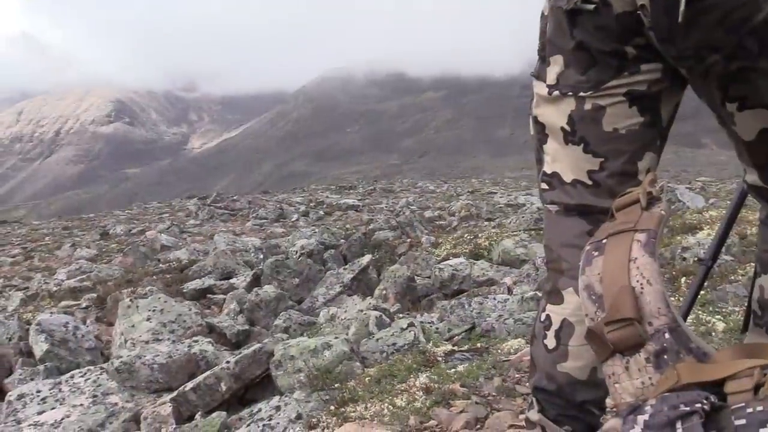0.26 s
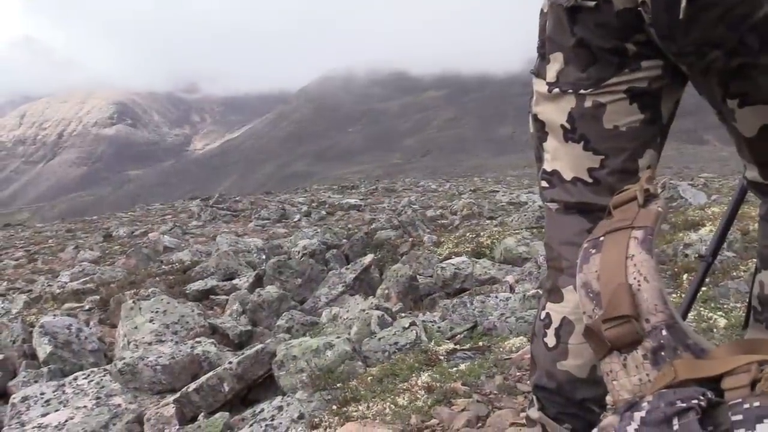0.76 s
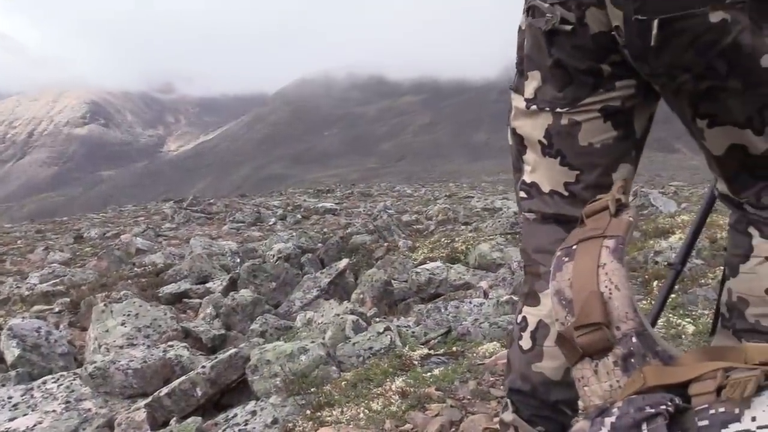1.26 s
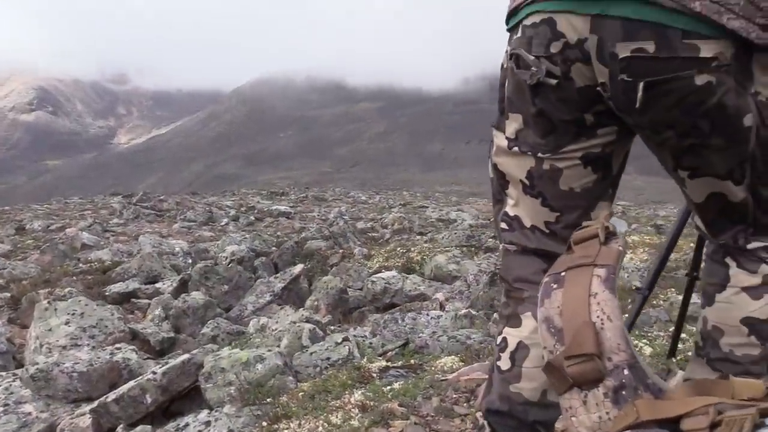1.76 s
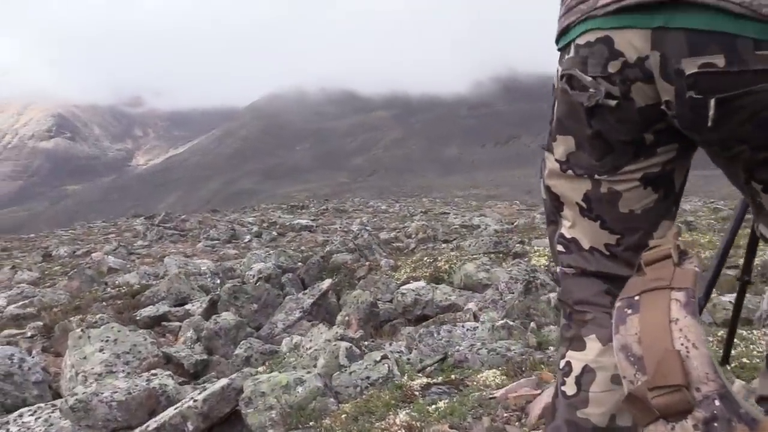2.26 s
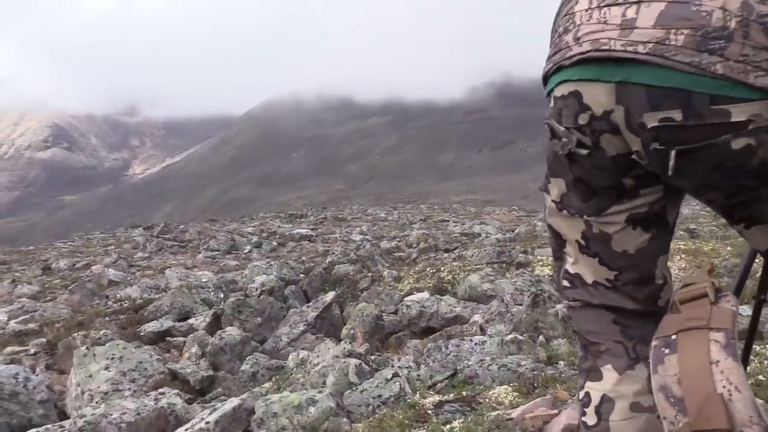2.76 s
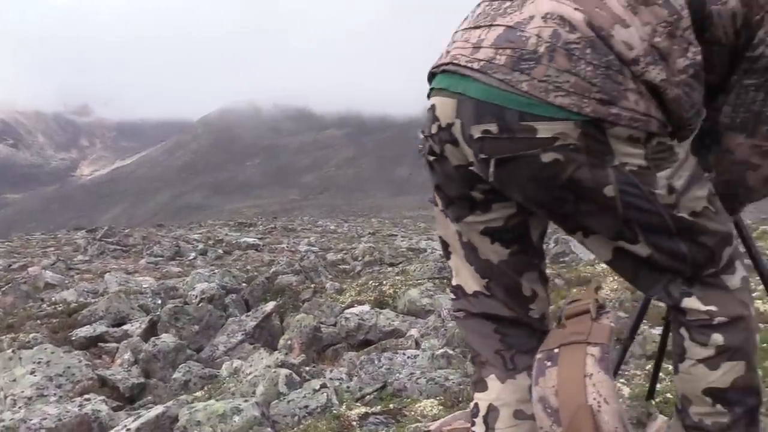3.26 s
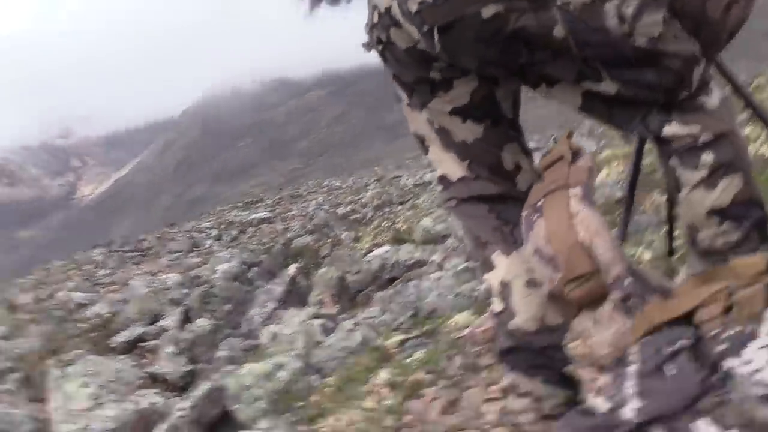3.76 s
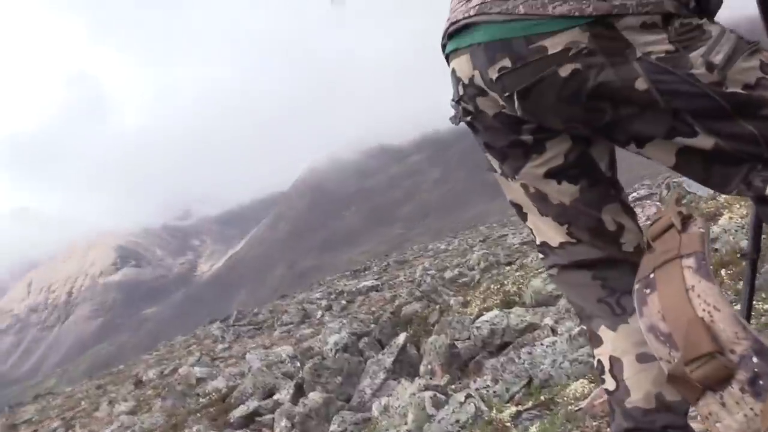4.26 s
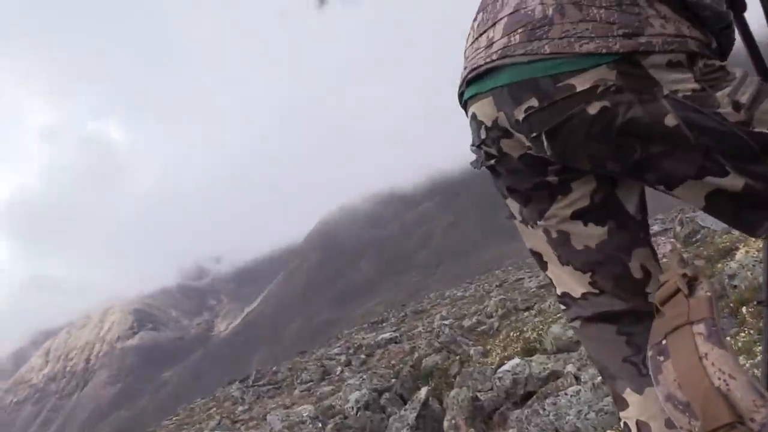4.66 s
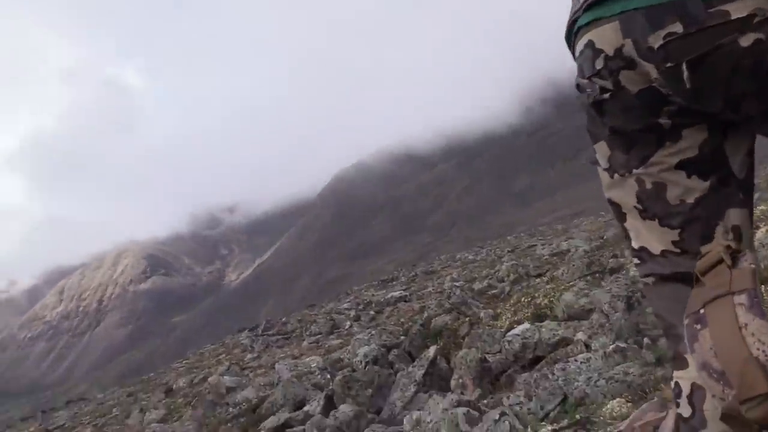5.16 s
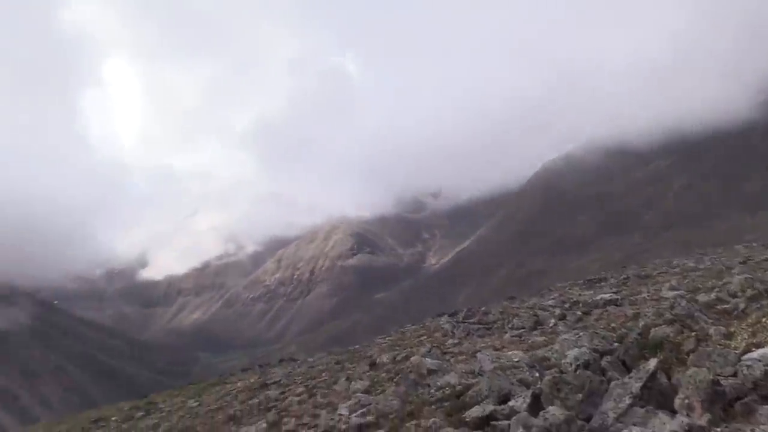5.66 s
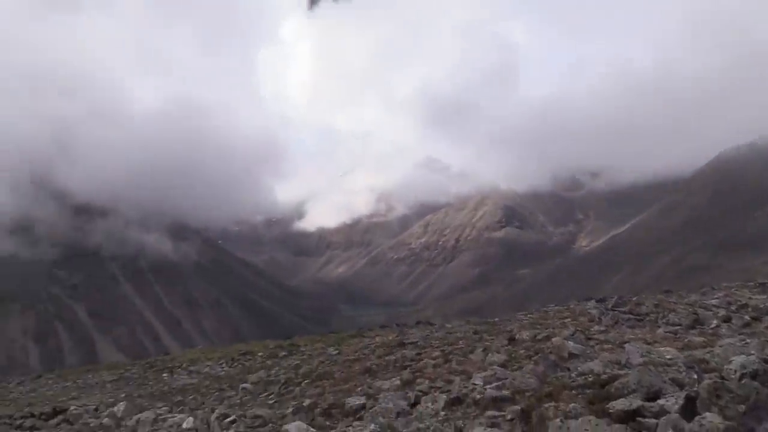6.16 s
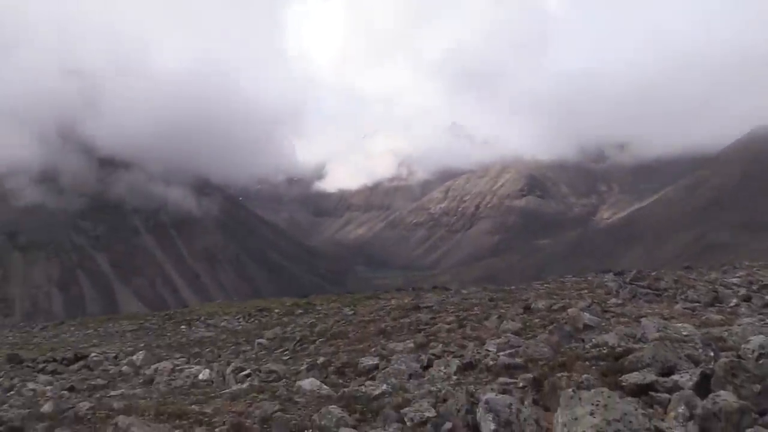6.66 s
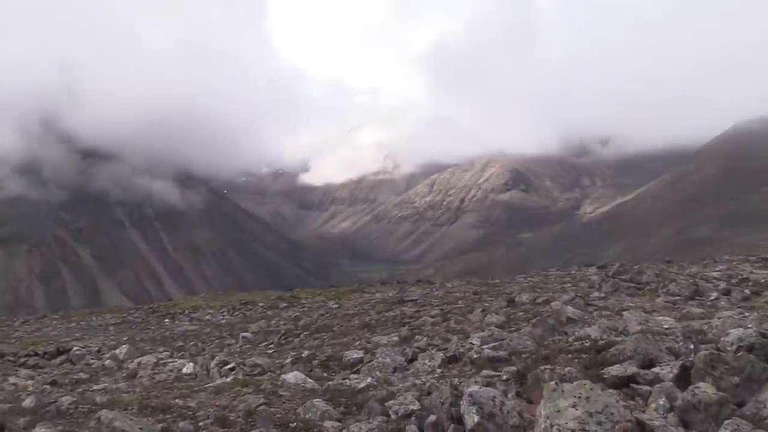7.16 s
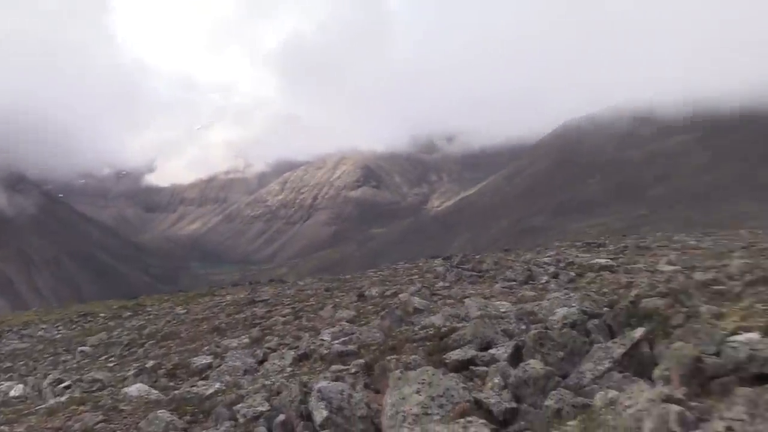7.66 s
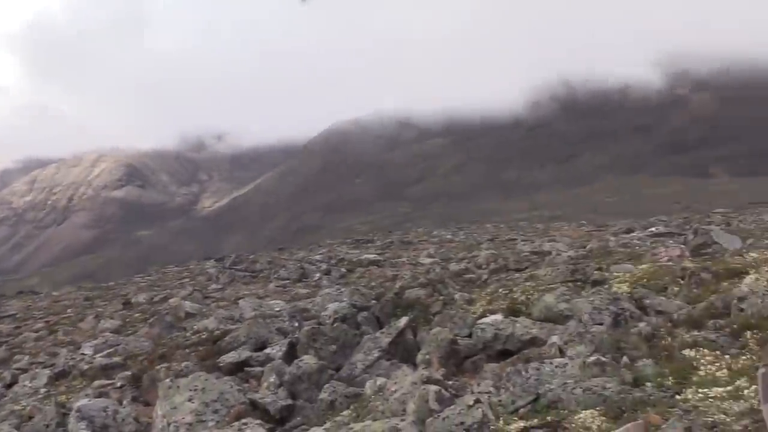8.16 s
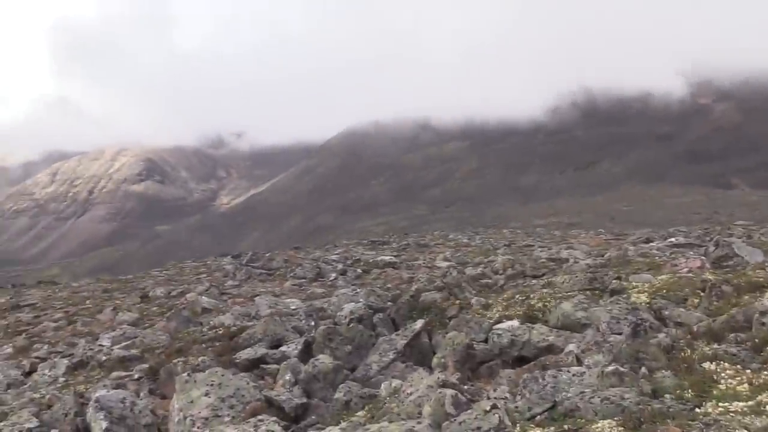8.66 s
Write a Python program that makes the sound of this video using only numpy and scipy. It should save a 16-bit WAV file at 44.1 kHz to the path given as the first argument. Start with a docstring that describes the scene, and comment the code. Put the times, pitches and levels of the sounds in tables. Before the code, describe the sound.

Stones clack and grind under boots while a pole and tripod legs clink against them, close to a hand-held stereo microphone outdoors. Dull thuds carry through the microphone's body. After low gusts and a single bump with a brief squeak, the busiest clatter comes just before the middle. It then thins to scattered knocks and taps, with faint, steady mountain air in the gaps.

```python
"""On an open ridge, boots, a pole and a tripod shift on loose rock beside a hand-held stereo microphone.
Far air makes a soft, steady hiss, and gusts rumble on the microphone. The level dips briefly twice.
A joint squeaks once, stones grind as they slip, and weight lands as dull thuds through the casing.
Loudest are the thuds and the clacks: hard hits that set stones and metal legs ringing."""
import sys
import numpy as np
from scipy import signal
from scipy.io import wavfile

SR = 44100
rng = np.random.default_rng(int(sys.argv[2]) if len(sys.argv) > 2 else 0)


def unload_wav(signal):
    """Save mono or channel-first audio to the path in sys.argv[1] as 16-bit WAV at rate SR, clipped to [-1, 1]."""
    wavfile.write(
        sys.argv[1],
        SR,
        np.round(np.clip(np.atleast_2d(signal).T, -1, 1) * 32767).astype(np.int16),
    )


N = 392574


def from_db(db):
    """Turn decibels into a number to multiply by."""
    return 10 ** (np.asarray(db) / 20)


def rms(x):
    """The average strength of a signal (root mean square)."""
    return np.sqrt(np.mean(x ** 2) + 1e-20)


def peak_one(x):
    """Scale a signal so that its biggest swing is 1."""
    return x / np.max(np.abs(x))


def filtered(x, order, hz, kind):
    """Keep the "low" part, the "high" part or a "band"; a higher order cuts more steeply."""
    return signal.sosfilt(signal.butter(order, hz, kind, fs=SR, output="sos"), x)


def in_time(rows):
    """Join a table's points with straight lines: one curve for each column after the time."""
    times, *columns = np.transpose(rows)
    return [np.interp(np.arange(N) / SR, times, column) for column in columns]


def at_hz(rows, hz):
    """Read a table between its frequencies, with octaves evenly spaced."""
    frequencies, values = np.transpose(rows)
    return np.interp(np.log(hz), np.log(frequencies), values)


def drift(rate):
    """A smooth random wobble of about 1 either way; a higher rate wobbles faster."""
    r = np.exp(-80 * np.pi * rate / SR)
    slow = signal.lfilter([1], [1, -2 * r, r * r], rng.standard_normal(N // 40 + 2002))[2000:]
    return np.interp(np.arange(N) / 40, np.arange(len(slow)), slow / rms(slow))


def ring(push, hz, t60):
    """Each push starts a tone that dies away; t60 is its ring time, the seconds to fade by 60 dB."""
    r = from_db(-60 / (max(t60, .002) * SR))
    w = 2 * np.pi * min(hz, .45 * SR) / SR
    return signal.lfilter([0, np.sin(w)], [1, -2 * r * np.cos(w), r * r], push + 1e-18)


def add(out, start, mid, pan_db, side):
    """Place a short sound: mid goes to both ears, side is added on the left and taken off the right."""
    i = round(start * SR)
    both = mid * from_db([[pan_db / 2], [-pan_db / 2]]) + side * np.array([[1], [-1]])
    out[:, i:i + len(mid)] += both[:, :N - i]


# How alike air and wind sound in the two ears: f/Hz, likeness (1 = the same, 0 = unrelated)
EAR_LIKENESS = [(60, 0.72), (130, 0.52), (290, 0.79), (640, -0.02), (1410, -0.13), (3100, 0.42),
                (6820, 0.54), (15000, 0.72)]

def banded_noise(spectrum, swell_db, flicker_db, rate):
    """Stereo noise of strength 1, made of narrow bands that swell together and flicker on their own."""
    out, together = 0, drift(rate)
    bottom, top = spectrum[0][0], spectrum[-1][0]
    edges = np.geomspace(bottom, top, round(2.5 * np.log2(top / bottom)))
    white = rng.standard_normal((2, 2, N))  # neighbouring bands get unrelated noise
    for k, (low, high) in enumerate(zip(edges, edges[1:])):
        mid, side = filtered(white[k % 2], 2, [low, high], "band")
        hz = np.sqrt(low * high)
        alike = at_hz(EAR_LIKENESS, hz)
        gain = from_db(at_hz(spectrum, hz) + swell_db * together + flicker_db * drift(rate))
        out = out + gain * (np.sqrt(1 + alike) * mid + np.sqrt(1 - alike) * side * [[1], [-1]])
    return out / rms(out.mean(axis=0))


# The level at which the microphone picks up the hiss: t/s, level/dB
HISS_LEVELS = [(0, -54), (.54, -56), (.6, -62.5), (.86, -61), (1.0, -56), (1.9, -54.5), (1.97, -62),
               (2.2, -59), (2.45, -55.5), (3.0, -54), (4.5, -55), (6.0, -55), (6.7, -54.5), (7.45, -53.5),
               (8.9, -55.5)]
# The tone colour of the hiss: f/Hz, relative level/dB
HISS_COLOUR = [(71, -84), (120, -13), (246, -1), (334, -3), (410, -0.5), (557, -4), (684, 1.5), (822, -1),
               (1650, -3), (3110, -15), (7820, -22.5), (14700, -33.5), (16000, -38)]

def far_air():
    """A soft, steady hiss of far air; the microphone's level briefly drops twice and recovers."""
    level_db, = in_time(HISS_LEVELS)
    return from_db(level_db) * banded_noise(HISS_COLOUR, swell_db=0.29, flicker_db=0.38, rate=7.5)


# Puffs of wind: t/s, length/s, level/dB
WIND_GUSTS = [(0, 0.34, -40), (.4, 0.13, -41.5), (0.59, .17, -53), (0.84, 0.23, -51), (1.142, 0.18, -47.5),
              (1.44, 0.25, -52.5), (1.75, 0.28, -55.5), (2.41, 0.17, -54.5), (2.66, 0.52, -53.5),
              (3.55, 0.64, -54), (4.294, 0.546, -57), (5.166, 0.7, -54), (5.95, 0.77, -67.5),
              (6.833, 0.051, -58), (7.73, 0.21, -55.5), (8.048, 0.8, -69)]
# The tone colour of their rumble: f/Hz, relative level/dB
WIND_COLOUR = [(13, -54), (22, -10), (59, 3.5), (108, 8), (208, -4.5), (249, -20), (292, -33), (318, -50),
               (400, -21.5), (520, -61), (880, -120)]

def gusts():
    """Wind buffets the microphone's openings: each gust swells, holds and drops back to calm."""
    rise_s, fall_s, calm_db = 0.045, 0.042, -74
    t = np.arange(N) / SR
    power = from_db(calm_db) ** 2
    for start, length, db in WIND_GUSTS:
        rise = np.clip((t - start) / rise_s + 1, 0, 1)
        fall = np.clip((start + length - t) / fall_s + 1, 0, 1)
        power = power + (from_db(db) * rise * fall) ** 2
    return np.sqrt(power) * banded_noise(WIND_COLOUR, swell_db=4, flicker_db=1, rate=14)


# The course of one squeak: t/s, f/Hz, level/dB
JOINT_SQUEAK = [(1.815, 2630, -61), (1.837, 2590, -34), (1.865, 2600, -61)]

def squeak():
    """A joint sticks and slips very fast, giving a brief, uneven tone with a faint octave above."""
    t = np.arange(N) / SR
    hz, db = in_time(JOINT_SQUEAK)
    phase = 2 * np.pi * np.cumsum(hz * (1 + 0.0043 * drift(120))) / SR
    tone = np.sqrt(2) * (np.sin(phase) + from_db(-25.5) * np.sin(2 * phase))
    fade = np.clip(np.minimum(t - JOINT_SQUEAK[0][0], JOINT_SQUEAK[-1][0] - t) / 0.014, 0, 1)
    return fade * from_db(db + 1.7 * drift(90)) * tone


def grains(per_s, low_hz, high_hz, cycles, spread_db, alike):
    """Tiny slips come at random, each ringing one of ten pitches for a number of cycles."""
    sizes = from_db(spread_db * np.minimum(rng.exponential(1, (2, N)), 4)) * rng.choice([-1, 1], (2, N))
    slips = sizes * (rng.random((2, N)) < per_s * from_db(3 * drift(30)) / SR)
    chosen = rng.integers(0, 10, N)
    pitches = np.geomspace(low_hz, high_hz, 10)
    ringing = sum(ring(slips * (chosen == k), hz, cycles / hz) for k, hz in enumerate(pitches))
    mid, side = filtered(ringing, 2, 0.33 * low_hz, "high")
    return mid / rms(mid) + np.sqrt(1 - alike) * side / rms(side) * [[1], [-1]]


# Scrapes on rock: t/s, length/s, coarse level/dB, fine level/dB, swell (+) or fade (-) on the way/dB
ROCK_SCRAPES = [(1.788, 0.051, -59, -66, 4), (1.879, 0.066, -42.5, -68, -6), (3.17, 0.1, -55.5, -65, 14.5),
                (3.266, .06, -28.5, -32, -5.5), (3.348, 0.044, -33, -48, 0.5),
                (3.404, 0.11, -43.5, -46.5, -5.5), (3.53, 0.074, -54, -57, -5), (3.619, 0.027, -54, -66, 9),
                (3.70, 0.1, -52, -57, 11), (3.799, 0.072, -27, -40, -13.5), (3.882, 0.051, -32, -44.5, -12),
                (3.933, .36, -51, -55.5, -1.5), (5.462, 0.072, -32.5, -62, -22.5),
                (6.144, 0.028, -64, -52, -3), (6.195, 0.055, -59, -52.5, 7.5),
                (6.217, 0.024, -36.5, -62, -22), (7.763, 0.025, -47, -72, -9), (8.553, 0.02, -50, -52, -4)]

def scrapes():
    """Rubbing on rough stone grinds coarse and fine grit and makes the casing shudder."""
    bite_s, fade_db_per_s = 0.0029, 1505.5
    t = np.arange(N) / SR
    coarse_gain = fine_gain = 0
    for start, length, coarse_db, fine_db, swell_db in ROCK_SCRAPES:
        bite = np.clip((t - start) / bite_s, 0, 1)
        progress = np.clip((t - start) / length, 0, 1)
        after_end = np.maximum(t - start - length, 0)
        stroke = bite * from_db(swell_db * progress - fade_db_per_s * after_end)
        coarse_gain += from_db(coarse_db) * stroke
        fine_gain += from_db(fine_db) * stroke
    shudder = from_db(-2.5) * grains(400, 123, 416, cycles=5.5, spread_db=2.2, alike=1)
    coarse = from_db(-0.5) * grains(4000, 503, 2630, cycles=14.7, spread_db=4.7, alike=0.29)
    fine = from_db(-6.5) * grains(8970, 3300, 10400, cycles=31, spread_db=2.3, alike=0.74)
    return coarse_gain * (shudder + coarse) + fine_gain * filtered(fine, 3, 13000, "low")


# Weight landing: t/s, level/dB, f/Hz, ring time/s
SOFT_BLOWS = [(1.817, -41, 348, 0.055), (1.864, -4, 213.5, 0.011), (1.885, -24, 266, 0.037),
              (1.927, -34.5, 127, 0.024), (3.167, -47, 363, 0.12), (3.266, -24, 305, 0.05),
              (3.3, -25, 271, 0.022), (3.353, -18, 400, 0.041), (3.545, -38, 109, 0.05),
              (3.642, -32.5, 250, 0.083), (3.693, -32, 322, 0.059), (3.741, -41, 248, 0.095),
              (3.781, -23, 209, 0.027), (3.803, -18.5, 276, 0.1), (3.807, -9, 223, 0.0057),
              (3.821, -36, 250, 0.074), (3.888, -7, 230, 0.0067), (3.903, -25.5, 251, 0.062),
              (3.951, -34, 132, 0.025), (4.046, -44, 270, 0.043), (4.897, -31, 154, 0.02),
              (5.306, -44, 137, 0.024), (5.426, -35, 113, 0.049), (5.461, -8, 187, 0.017),
              (5.479, -18.5, 307, 0.045), (5.498, -29.5, 142, 0.032), (5.685, -37, 154, 0.023),
              (5.814, -38.5, 111, 0.041), (6.212, -19.5, 209, 0.023), (6.221, -23.5, 333, 0.072),
              (6.377, -44, 148, 0.035), (7.248, -38, 257, 0.016), (7.372, -37, 450, 0.017),
              (7.591, -39.5, 199, 0.014), (7.741, -38, 213, 0.025), (7.778, -37.5, 163, 0.04),
              (7.827, -40.5, 204, 0.034), (7.988, -33, 316, 0.061), (8.074, -38, 172, 0.051),
              (8.473, -43, 320, 0.1)]

def thuds():
    """A soft push, about two cycles long, sets the casing swinging at the pitch of the blow."""
    out, t = np.zeros((2, N)), np.arange(SR // 5) / SR
    for start, db, hz, t60 in SOFT_BLOWS:
        progress = np.clip((t - .0015) * hz / 1.855, 0, 1)
        push = np.sin(2 * np.pi * 2.03 * progress) * np.sin(np.pi * progress) ** 2
        swing = ring(push, hz, t60) + from_db(-10.5) * ring(push, 1.51 * hz, 0.9 * t60)
        lead = np.gradient(swing)  # one opening feels the blow a little earlier
        add(out, start, from_db(db) * peak_one(swing), pan_db=0, side=from_db(db - 10.5) * peak_one(lead))
    return out


# The tones of a stone: multiple of its main pitch, relative level/dB
STONE_TONES = [(1, 4), (.45, -4), (1.33, 0.5), (1.58, -3), (1.98, -0.5), (2.27, -14), (3.0, -11)]

def stone_ring(contacts, hz, hit_db, strengths):
    """A light tap rings one clear tone; a hard blow is a short crunch of them all."""
    gentleness = np.clip(.7 - hit_db / 25.5, .5, 2.5)
    cycles = 12.7 * gentleness
    stone = 0
    for (multiple, db), strength in zip(STONE_TONES, strengths):
        tone = ring(contacts, multiple * hz, cycles / (multiple * hz))
        stone += strength * from_db(db * gentleness) * peak_one(tone)
    return peak_one(filtered(stone, 2, 0.57 * hz, "high"))  # little sounds below the stone's main pitch


# The tones of the pole and tripod legs: f/Hz, relative level/dB, ring time/s
LEG_TONES = [(3310, -22, 0.011), (3580, 4.5, 0.023), (5160, 1, 0.0041), (5720, 11.5, 0.0033),
             (6600, 0, 0.034), (7600, 7, 0.0077), (8960, -15, 0.0084), (9600, -7, 0.012),
             (11800, -35, 0.021)]

def metal_clink(touch, ping_hz, strengths):
    """A sharp touch rings the metal legs, along with a short ping and a snap."""
    legs = sum(strength * from_db(db) * ring(touch, hz, t60)
               for (hz, db, t60), strength in zip(LEG_TONES, strengths))
    ping = ring(touch, ping_hz, t60=0.00526)
    snap = filtered(touch, 2, [2000, 10500], "band")
    clink = from_db(-3.5) * peak_one(legs) + peak_one(ping) + from_db(-4) * peak_one(snap)
    return peak_one(filtered(clink, 4, 12500, "low"))  # no hit is short enough for the very top


# Hard hits: t/s, level/dB, stone f/Hz, metal share/dB, ping f/Hz, left over right/dB, chatter time/s
HARD_HITS = [(1.79, -38.5, 1170, -24, 3060, 8, .0035), (1.869, -15.5, 726, -31, 3430, -2, 0.0028),
             (1.904, -28.5, 797, -48, 3640, -10, 0.0014), (3.137, -31.5, 1730, -29, 3560, 4, 0.015),
             (3.181, -37, 1010, -25, 3530, .5, 0.0056), (3.269, -7.5, 1070, -28, 3000, .5, 0.0063),
             (3.284, -31, 764, 7, 5600, -10, 0.01), (3.301, -18, 920, -12, 3050, -2, 0.0068),
             (3.339, -16.5, 1000, -14, 4150, 2, 0.0033), (3.344, -7.5, 1115, 0.5, 5030, -3.5, 0.0045),
             (3.381, -21.5, 1080, 7, 7700, -4, .0053), (3.385, -16.5, 1280, -22, 3330, -3.5, 0.0046),
             (3.444, -33, 1600, -5, 3540, 4, .0055), (3.514, -28, 960, -29, 3180, 2, 0.0051),
             (3.526, -24, 958, 1.5, 7500, 0, 0.0057), (3.648, -24.5, 1610, -6, 3500, 1, 0.0046),
             (3.693, -32.5, 1260, -2, 4230, -2, 0.0023), (3.79, -8.5, 993, -17, 2780, -11.5, 0.0015),
             (3.806, -10.5, 1220, -45, 3090, -3, 0.0023), (3.819, -28, 810, -19, 3980, -2, 0.0036),
             (3.832, -22, 1200, -22, 3560, 4, 0.0033), (3.845, -36, 850, 1, 3160, -4, 0.0036),
             (3.892, -18.5, 760, -34, 3060, -3, 0.00097), (3.911, -36.5, 1190, 1, 5800, 0, 0.00092),
             (3.927, -21.5, 1460, -38, 3140, -4, 0.0011), (3.985, -29.5, 1200, -35, 4000, 2, 0.00083),
             (5.21, -37.5, 900, -3.5, 7100, 2, 0.0014), (5.293, -62, 960, 13, 6700, 2, 0.0028),
             (5.467, -22.5, 1200, -38, 3580, 5, 0.0079), (5.483, -27, 836, -26, 3380, -10, 0.0014),
             (6.128, -30, 1400, 2, 5500, -5, 0.0016), (6.144, -41, 1250, 5.5, 5600, -2, .0021),
             (6.149, -36.5, 1390, -14, 5600, -3, 0.01), (6.181, -35, 1380, -2.5, 5500, -5, 0.0086),
             (6.219, -29.5, 1160, -8.5, 8800, -5, 0.0032), (6.247, -51, 1050, 13, 5600, -6, 0.0024),
             (6.504, -38, 1100, -25, 4140, 4, 0.0021), (7.376, -36.5, 1020, 3, 7400, 4, 0.0014),
             (7.742, -36, 485, -25, 3000, 0, 0.00078), (7.751, -30.5, 890, -19, 3040, -2, 0.0056),
             (7.779, -29.5, 1190, -35, 2670, 1, .0021), (7.833, -27, 918, -36, 2700, 4, 0.0041),
             (8.064, -34, 1200, -30, 3130, 4, 0.0067), (8.076, -35.5, 1450, -36, 3160, 0, 0.0049),
             (8.543, -19, 1620, -5, 7500, 3, 0.0021)]

def clacks():
    """A sharp first touch and a quick chatter ring stone and metal, then loose bits crumble."""
    out, t = np.zeros((2, N)), np.arange(SR // 10) / SR
    onset = 1 - np.exp(-t / 0.0014)
    crumble = from_db(-34) * np.exp(-t / 0.039)
    for start, db, hz, metal_db, ping_hz, pan_db, chatter_s in HARD_HITS:
        contacts = rng.standard_normal((2, len(t))) * onset * (np.exp(-t / chatter_s) + crumble)
        touch = contacts * (from_db(-30.5) + np.exp(-t / 0.00044))  # the treble is spent early
        strengths = from_db(0.87 * rng.standard_normal(len(STONE_TONES) + len(LEG_TONES)))
        stone = stone_ring(contacts[0], hz, db, strengths)
        clink_mid, clink_side = metal_clink(touch, ping_hz, strengths[::-1])
        # The microphone's stereo widening spreads a band near 1 kHz to the sides.
        side_band = filtered(ring(contacts[1], hz=1040, t60=0.015), 2, 450, "high")
        straight_ahead = 3.1 < start < 3.6  # the other hits land off to the side
        widening = from_db(-28 if straight_ahead else -2.5) * peak_one(side_band)
        mid = stone + from_db(metal_db + 7) * clink_mid
        side = widening + from_db(metal_db - 8) * clink_side
        add(out, start, from_db(db - 2.5) * mid, pan_db, from_db(db + 6.5) * side)
    return out


def scene():
    """Air and wind, with all the sounds of shifting on rock added on top."""
    return far_air() + gusts() + clacks() + thuds() + scrapes() + squeak()


def record(dry):
    """The microphone weakens the deep bass, rounds the loudest peaks and cuts off the highest treble."""
    thinned = filtered(dry, 3, 45, "high")
    rounded = .9 * np.tanh(thinned / .9)
    return signal.sosfilt(signal.cheby2(12, 60, 16600, fs=SR, output="sos"), rounded)


dry = scene()
out = record(dry)
unload_wav(out)
```